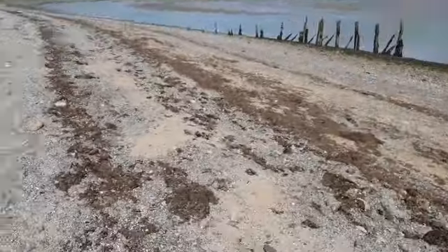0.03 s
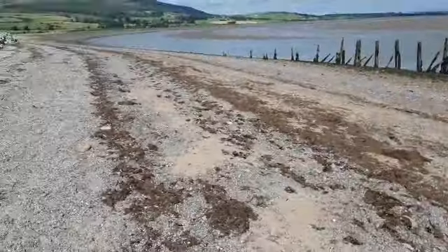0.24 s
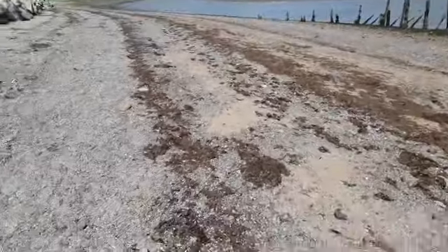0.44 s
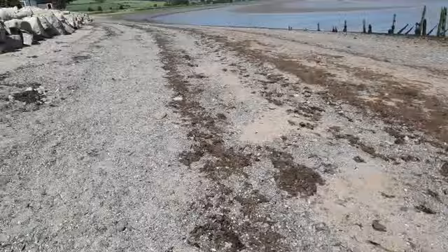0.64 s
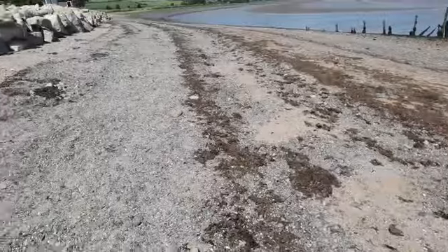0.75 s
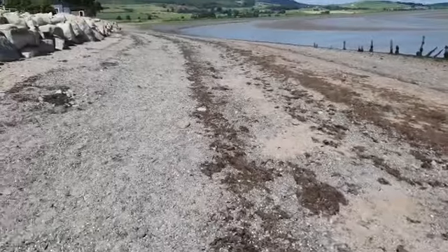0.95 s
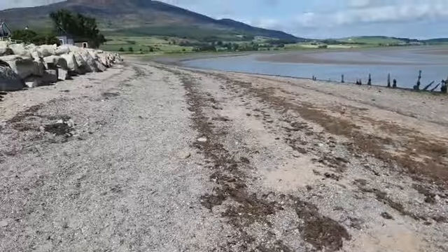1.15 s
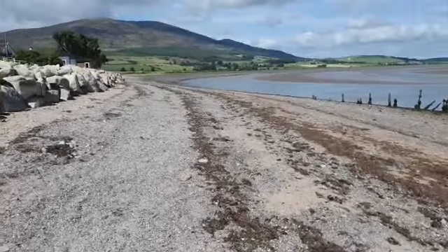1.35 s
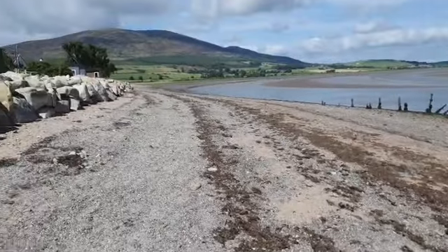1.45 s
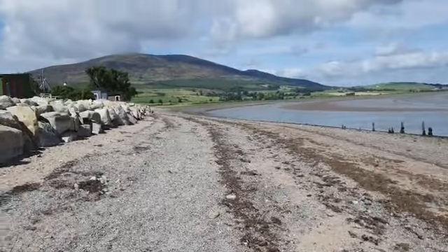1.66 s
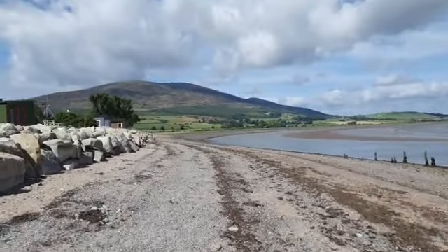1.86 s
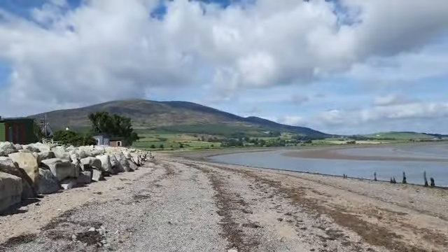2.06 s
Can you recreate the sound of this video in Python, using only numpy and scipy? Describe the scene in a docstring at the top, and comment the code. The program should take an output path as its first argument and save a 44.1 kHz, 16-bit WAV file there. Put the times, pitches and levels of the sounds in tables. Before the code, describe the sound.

Wind dominates: after a quieter start, deep rumbling, fluttering gusts hit the microphone from 0.2 seconds, with sharp pressure thumps near 0.8 and 0.95 and the hardest at 1.36. Underneath, footsteps grind shingle irregularly, strongest around 0.35 to 0.55 and 0.93, with dry pebble clicks and brief sandy scuffs until 1.3. Hollow handling knocks come at 1.6 and 1.86 as wind fades over a faint shore wash.

```python
"""A shingle beach in gusty wind, with footsteps heard from a hand-held camera.
Each step grinds stones and grit (thousands of tiny rings); single pebbles click, and sand hisses.
Wind on the microphone is louder than the steps: shaped noise rumbles, buffets and puffs, and single
pressure pulses thump. A few hollow knocks ring close by, over the faint noise wash of the shore."""
import sys
import numpy as np
from scipy import signal
from scipy.fft import rfft, irfft, next_fast_len
from scipy.io import wavfile
from scipy.ndimage import uniform_filter1d

SR = 44100
rng = np.random.default_rng(int(sys.argv[2]) if len(sys.argv) > 2 else 0)


def digitize_waveform(pressure):
    """Quantize a signal to 16-bit integers and store it at the path in sys.argv[1].

    Rows of a 2-D input are taken as channels; values are limited to [-1, 1].
    """
    field = np.atleast_2d(pressure).T
    bounded = np.clip(field, -1, 1)
    quanta = np.round(bounded * 32767).astype(np.int16)
    wavfile.write(sys.argv[1], SR, quanta)


N = 92610
T = np.arange(N) / SR  # time of every sample [s]

# All table levels are those before any trim or filter that follows.
# Stones grinding underfoot: (time [s], coarse stones level [dB], small stones level [dB])
CRUNCH_LEVELS = [(0,-64.5,-56.5),(.05,-66.5,-69),(.09,-66,-64.5),(.125,-56,-57),(.2,-61.5,-56.5),(.25,-54.5,-55),(.31,-63.5,-58),(.345,-60,-60),(.362,-49.5,-56.5),(.405,-69.5,-63),(.46,-64.5,-53),(.485,-55.5,-55.5),(.535,-53,-50),(.6,-75.5,-63.5),(.66,-69,-67),(.73,-58.5,-59.5),(.775,-71.5,-68.5),(.84,-62,-72),(.865,-67,-74.5),(.915,-61,-67),(.935,-52,-62.5),(.99,-60,-63),(1.05,-69,-68),(1.12,-62.5,-69),(1.18,-72,-66.5),(1.22,-58.5,-64),(1.28,-64,-64),(1.34,-74.5,-73),(1.42,-77.5,-87.5),(1.62,-73,-79.5),(1.8,-80,-85),(1.89,-74.5,-79.5),(2.1,-78,-80)]
# Highest fizz of the grit: (time [s], level [dB])
GRIT_LEVELS = [(0,-71),(.03,-76),(.08,-68),(.17,-75),(.25,-72.5),(.34,-72.5),(.365,-63),(.42,-75),(.46,-70),(.53,-65.5),(.6,-70.5),(.65,-68.5),(.74,-74),(.77,-86.5),(.85,-74),(.917,-77.5),(.935,-59),(.98,-75),(1.06,-81),(1.13,-88),(1.22,-83),(1.41,-102),(1.48,-86.5),(1.56,-102),(2.0,-100),(2.05,-80.5),(2.1,-88)]
# Tone of the coarse stones, the small stones and the grit: (frequency [Hz], gain [dB])
COARSE_TONE = [(200,-7.5),(450,2.5),(800,3),(1300,-0.5),(1900,-2),(2600,-10),(4000,-28.5),(6000,-60.5)]
SMALL_TONE = [(700,-24.5),(1400,-3),(2100,0.5),(2700,1.5),(3400,3),(4200,-6.5),(5000,-11),(6000,-21.5),(7200,-40.5),(9000,-76)]
GRIT_TONE = [(7500,-53),(8600,-16.5),(9500,-1),(10300,-4.5),(11300,-11),(12500,-28),(15500,-26.5),(17000,-47)]
COARSE_TRIM_DB, SMALL_TRIM_DB, GRIT_TRIM_DB = 1.5, -1, -0.5

GRAINS_PER_S = 3500  # average number of stone contacts each second, over all pitches
GRAIN_SPREAD_DB = 1  # average extra strength of a contact
GRAIN_CYCLES = 2.8  # cycles for a contact's ring to fall to about a third
CLUMP_DB = 3.5  # stones give way in clumps: largest swell or dip

# A heel digging in, a sudden spray of stones: (time [s], level [dB], decay [s])
HEEL_SPRAYS = [(.921,-55,.022)]
# Tone of the spray: (frequency [Hz], gain [dB])
SPRAY_TONE = [(500,-9.5),(900,-0.5),(2000,-5.5),(3500,0),(5000,-14),(7200,-40),(8400,-11),(9400,5.5),(10500,-7),(12500,-25),(16000,-23)]

# A sole sliding over sand: (start time [s], length [s], level [dB])
SCUFF_EVENTS = [(0.667,0.1,-63),(1.233,0.093,-66)]
# Tone of the sand: (frequency [Hz], gain [dB])
SAND_TONE = [(1000,-29.5),(2500,-15.5),(3800,-2),(4800,-7.5),(5800,-17),(7200,-48)]

# Single pebbles knocking together: (time [s], peak level [dB], pitch [Hz], decay [s])
PEBBLE_EVENTS = [(.139,-38,3400,0.00035),(0.248,-38.5,3180,0.0011),(0.282,-37.5,3400,.0005),(0.362,-42,1500,0.00024),(0.4498,-31.5,3300,0.00025),(.525,-35,2900,.0005),(0.589,-31,2760,0.00022),(0.6409,-35,2820,0.00037),(.84,-45.5,1820,0.00093),(1.0145,-34.5,2450,0.00075),(1.018,-33.5,850,0.00052),(1.091,-31.5,780,0.00053),(1.199,-44,1300,0.00038),(1.236,-42.5,1500,0.00035)]
# Tone of the pebbles: (frequency [Hz], gain [dB])
PEBBLE_TONE = [(100,-15),(450,2),(3800,-1.5),(5200,-8.5),(7200,-39),(8400,-19),(9600,-7),(11000,1),(12500,-43.5),(16000,-39.5)]
OVERTONE_RATIO, OVERTONE_DB = 1.7, -16.5  # second ring: pitch and level against the first
SNAP_DB = -13.5  # noise at the contact, for pebbles pitched at 2500 Hz or above

# Small hollow knocks close by, probably the hand on the camera: (time [s], peak level [dB])
KNOCK_EVENTS = [(.1,-41.5),(1.603,-42.5),(1.859,-31),(1.962,-51.5)]
# Rings of the knocked body: (frequency [Hz], level [dB], time to fall by 60 dB [s])
KNOCK_RINGS = [(560,0.5,0.019),(1080,-4.5,0.01),(1607,-6.5,0.0063),(2570,-11,.004),(3580,-12.5,.008)]
# Tone of the knocks: (frequency [Hz], gain [dB])
KNOCK_TONE = [(150,-11),(500,1.5),(4200,-4),(6000,-14),(9000,-19)]

# Strength of the wind at the microphone: (time [s], rumble level [dB], buffeting level [dB])
WIND_LEVELS = [(0,-36.5,-61),(.18,-47.5,-61),(.225,-26.5,-21),(.265,-16,-24.5),(.3,-17,-25),(.38,-22,-34.5),(.45,-20,-22.5),(.52,-16.5,-27),(.56,-25,-31.5),(.61,-19,-30),(.645,-32.5,-38),(.69,-33,-48),(.75,-23.5,-31),(.83,-21,-25.5),(.89,-28,-34.5),(.95,-22,-24.5),(1.01,-23,-42.5),(1.055,-42,-51),(1.105,-22,-30),(1.19,-27,-35.5),(1.23,-23,-26.5),(1.315,-18.5,-35),(1.365,-17.5,-23),(1.4,-27.5,-42.5),(1.44,-19,-39),(1.472,-27,-18.5),(1.5,-23.5,-31.5),(1.548,-18,-28),(1.575,-51.5,-64),(1.63,-30.5,-47.5),(1.66,-52,-66),(1.7,-17.5,-32),(1.76,-33,-35),(1.79,-22.5,-32),(1.825,-21,-32),(1.86,-30,-56.5),(1.98,-38,-54),(2.1,-50,-81.5)]
# Tone of the rumble and of the buffeting: (frequency [Hz], gain [dB])
RUMBLE_TONE = [(15,-18),(30,-6.5),(48,-5.5),(65,0),(90,-5.5),(125,-9.5),(200,-31.5),(400,-52),(900,-98)]
BUFFET_TONE = [(60,-25),(115,-3.5),(165,5),(230,-2.5),(300,-16),(420,-26.5),(630,-45.5),(900,-60.5),(2000,-94.5)]
RUMBLE_TRIM_DB, BUFFET_TRIM_DB = 2.5, -1
# How far chance swells are evened out: 0 is not at all, 1 is most
RUMBLE_EVEN, BUFFET_EVEN, PUFF_EVEN = 0.23, 0.33, 1

# Short puffs fluttering higher than the rumble: (middle time [s], width at half height [s], level [dB])
PUFF_EVENTS = [(0.102,0.012,-46.5),(.227,.01,-29.5),(0.252,0.0099,-23),(0.279,0.021,-27.5),(0.29,0.0048,-34.5),(0.325,0.0072,-31.5),(0.356,0.0082,-32.5),(0.386,0.016,-43.5),(0.422,0.031,-33.5),(0.482,0.0088,-24),(0.52,0.0083,-35),(0.655,0.0069,-37),(.7,0.0084,-49),(0.749,0.014,-33),(0.804,0.0057,-25.5),(0.836,.012,-24.5),(0.872,.02,-44.5),(0.94,.019,-22),(.954,0.0045,-24),(1.023,0.016,-42),(1.167,0.023,-32),(1.235,0.023,-33.5),(1.267,0.0058,-29.5),(1.307,0.012,-27),(1.355,0.012,-28.5),(1.404,0.018,-36.5),(1.482,.02,-27),(1.525,0.02,-40),(1.693,.012,-44),(1.72,.014,-38.5),(1.737,.012,-39),(1.805,0.032,-56)]
# Tone of the puffs: (frequency [Hz], gain [dB])
PUFF_TONE = [(150,-18),(260,10.5),(340,2.5),(450,-6),(560,-15),(700,-22),(1000,-42.5),(2000,-78)]

# Sharp eddies hitting the microphone: (middle time [s], peak level [dB], width [s])
THUMP_EVENTS = [(.799,-23.5,.0011),(0.835,-23.5,0.0027),(.953,-14.5,0.0021),(1.3629,-5,0.0011)]
# Tone of the thumps: (frequency [Hz], gain [dB])
THUMP_TONE = [(40,-8.5),(120,7.5),(300,-3),(500,-1.5),(750,-11.5),(1100,-5),(1500,-0.5),(2200,-14)]
# The microphone's bass loss, applied to the wind: (frequency [Hz], gain [dB])
BASS_LOSS = [(15,-24),(28,-4.5),(42,0),(100,-0.5)]

# Tone of the distant shore: (frequency [Hz], gain [dB])
SHORE_TONE = [(60,8),(250,1),(500,-3.5),(1000,-6),(2000,-30.5),(3000,-33.5),(3700,-20),(5000,-29.5),(7000,-35),(9700,-43),(12500,-46.5),(16000,-50)]
SHORE_DB = -67.5
EDGE_HZ = 15800  # top of the recorder's range


def amp(db):
    """Turns decibels into a gain."""
    return 10 ** (np.asarray(db) / 20)


def unit(x):
    """Scales a sound to an average strength (rms) of one."""
    return x / np.sqrt(np.mean(x ** 2) + 1e-20)


def level(table, column=1):
    """Draws a smooth gain over time through one dB column of a table."""
    rows = np.array(table)
    return amp(np.interp(T, rows[:, 0], rows[:, column]))


def colour(x, points):
    """Filters a sound, making each frequency louder or softer as the points say."""
    hz, db = np.transpose(points)
    size = next_fast_len(2 * len(x))  # spare room, so the end does not wrap onto the start
    log_hz = np.log(np.fft.rfftfreq(size, 1 / SR) + 1)
    gain = amp(np.interp(log_hz, np.log(hz), db))
    return irfft(rfft(x, size) * gain, size)[:len(x)]


def add(mix, time, sound):
    """Mixes a sound in, starting at a time in seconds."""
    part = mix[round(time * SR):][:len(sound)]
    part += sound[:len(part)]


def grains(lo_hz, hi_hz, count=30):
    """Many tiny stone contacts, each ringing a few cycles, arrive at random and swell in clumps."""
    t = np.arange(512) / SR
    out = np.zeros(N)
    for hz in np.geomspace(lo_hz, hi_hz, count):
        hits = rng.random(N) < GRAINS_PER_S / count / SR
        extra_db = GRAIN_SPREAD_DB * np.minimum(rng.exponential(1, N), 4)
        strengths = amp(extra_db) * rng.choice([-1, 1], N)
        ring = np.sin(2 * np.pi * hz * t) * np.exp(-t * hz / GRAIN_CYCLES)
        out += signal.oaconvolve(hits * strengths, unit(ring) * np.sqrt(hz))[:N]
    clumps = unit(uniform_filter1d(rng.standard_normal(N), size=350))
    return out * amp(CLUMP_DB * np.tanh(clumps))


def shingle():
    """Coarse stones, small stones and fine grit grind under the weight of each step."""
    coarse = unit(colour(grains(400, 2600), COARSE_TONE))
    small = unit(colour(grains(1400, 6000), SMALL_TONE))
    grit = unit(colour(grains(8500, 17000), GRIT_TONE))
    coarse *= amp(COARSE_TRIM_DB) * level(CRUNCH_LEVELS, column=1)
    small *= amp(SMALL_TRIM_DB) * level(CRUNCH_LEVELS, column=2)
    grit *= amp(GRIT_TRIM_DB) * level(GRIT_LEVELS)
    return coarse + small + grit


def heels():
    """A heel lands at once, and the stones it throws settle in a fading spray of contacts."""
    swell = np.zeros(N)
    for start, db, decay in HEEL_SPRAYS:
        swell += amp(db) * (T > start) * np.exp(-abs(T - start) / decay)
    return swell * unit(colour(grains(700, 12000), SPRAY_TONE))


def scuffs():
    """A sliding sole stirs many sand contacts, heard as short swells of bright hiss."""
    swell = np.zeros(N)
    for start, length, db in SCUFF_EVENTS:
        progress = np.clip((T - start) / length, 0, 1)
        swell += amp(db) * np.sin(np.pi * progress)
    return swell * unit(colour(grains(1700, 6500), SAND_TONE))


def pebbles():
    """Each knock of two pebbles is a noisy snap and two quickly dying rings."""
    t = np.arange(600) / SR
    out = np.zeros(N)
    for time, db, hz, decay in PEBBLE_EVENTS:
        ring = np.sin(2 * np.pi * hz * t)
        ring += amp(OVERTONE_DB) * np.sin(2 * np.pi * hz * OVERTONE_RATIO * t)
        # Lower pebbles snap more softly
        snap = amp(SNAP_DB) * min(hz / 2500, 1) ** 2 * rng.standard_normal(len(t))
        click = (ring + snap) * np.sqrt(t) * np.exp(-t / decay)
        add(out, time, amp(db) * click / abs(click).max())
    return colour(out, PEBBLE_TONE)


def knocks():
    """The same small body rings briefly, at several pitches, for every knock."""
    t = np.arange(1500) / SR
    out = np.zeros(N)
    ring = np.zeros(len(t))
    for hz, db, t60 in KNOCK_RINGS:
        ring += amp(db - 60 * t / t60) * np.sin(2 * np.pi * hz * t)
    for time, db in KNOCK_EVENTS:
        add(out, time, amp(db) * ring / abs(ring).max())
    return colour(out, KNOCK_TONE)


def turbulence(spectrum, even, size=700):
    """Low noise whose chance swells are partly evened out, so that the gusts set its level."""
    noise = unit(colour(rng.standard_normal(N), spectrum))
    power = abs(signal.hilbert(noise)) ** 2
    for _ in range(2):  # smooth twice
        power = uniform_filter1d(power, size=size)
    return unit(noise / (abs(power) + 1e-4) ** (even / 2))


def wind():
    """Turbulent air pushes on the microphone: deep rumble and higher buffeting follow the gusts."""
    rumble = level(WIND_LEVELS, column=1) * turbulence(RUMBLE_TONE, RUMBLE_EVEN)
    buffeting = level(WIND_LEVELS, column=2) * turbulence(BUFFET_TONE, BUFFET_EVEN)
    return amp(RUMBLE_TRIM_DB) * rumble + amp(BUFFET_TRIM_DB) * buffeting


def puffs():
    """Brief eddies are bursts of turbulence that swell and die within hundredths of a second."""
    swell = np.zeros(N)
    for middle, width, db in PUFF_EVENTS:
        swell += amp(db) * 2 ** -((2 * (T - middle) / width) ** 2)
    return swell * turbulence(PUFF_TONE, PUFF_EVEN, size=300)


def thumps():
    """Each sharp eddy is one quick push and pull of pressure."""
    out = np.zeros(N)
    for middle, db, width in THUMP_EVENTS:
        u = (T - middle) / width
        push = -u / (1 + u ** 2) ** 1.82
        out += amp(db) * push / push.max()
    return colour(out, THUMP_TONE)


def shore():
    """The open shore is a faint, steady wash of filtered noise."""
    return amp(SHORE_DB) * unit(colour(rng.standard_normal(N), SHORE_TONE))


def scene():
    """Steps, knocks, wind and shore meet at one microphone."""
    steps = shingle() + heels() + scuffs() + pebbles()
    gusts = colour(wind() + puffs() + thumps(), BASS_LOSS)
    mix = steps + knocks() + gusts + shore()
    return mix[None]  # one channel


def record(dry):
    """The recorder keeps only the sound below its top frequency."""
    low_pass = signal.firwin(511, EDGE_HZ, window=("kaiser", 9), fs=SR)
    return signal.oaconvolve(dry, low_pass[None], "same")


dry = scene()
out = record(dry)
digitize_waveform(out)
```